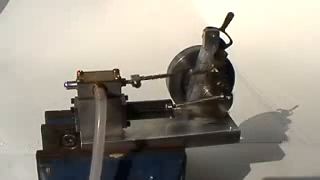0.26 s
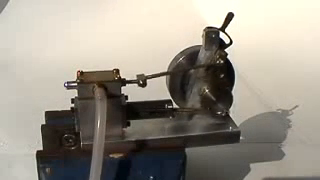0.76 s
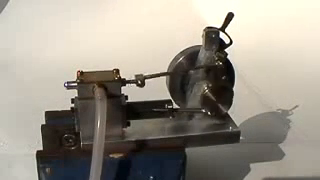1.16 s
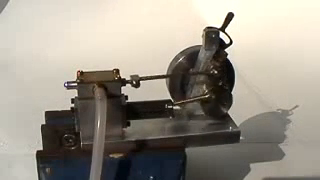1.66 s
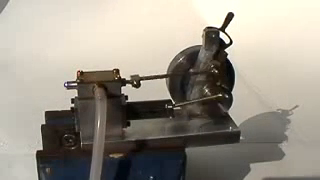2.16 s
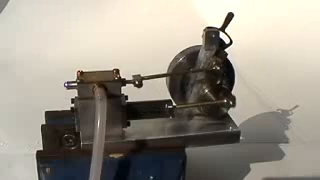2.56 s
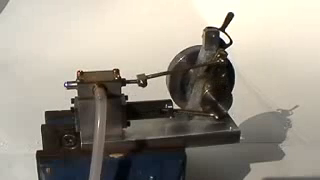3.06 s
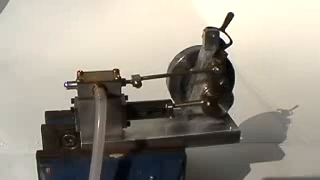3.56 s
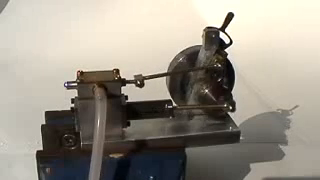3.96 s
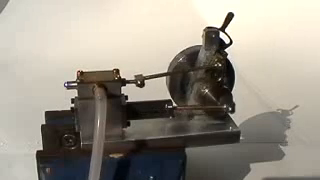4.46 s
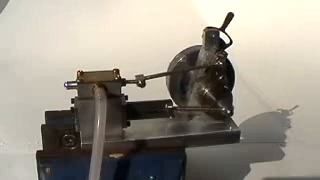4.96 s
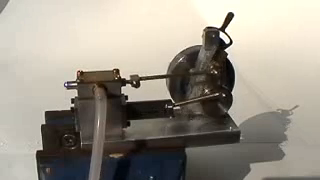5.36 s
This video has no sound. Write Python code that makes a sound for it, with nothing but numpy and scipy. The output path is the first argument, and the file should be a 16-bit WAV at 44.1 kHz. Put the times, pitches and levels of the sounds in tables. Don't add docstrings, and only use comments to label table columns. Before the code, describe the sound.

A bench-top model engine, heard by a nearby camera microphone, rattles rapidly from the start with clicking exhaust puffs, leaking air and bearing rumble. The base begins rocking hollowly after two seconds. Just past three, the hiss falls and the engine slows to a looser, knocking chug with bench bumps, a tiny water spit and a tick near the end. Short dull reflections, mostly narrow stereo.

```python
import sys
import numpy as np
from scipy import signal
from scipy.fft import rfft, irfft, next_fast_len
from scipy.io import wavfile
from scipy.ndimage import uniform_filter1d

SR = 44100
rng = np.random.default_rng(int(sys.argv[2]) if len(sys.argv) > 2 else 0)


def volts_from_db(level):
    exponent = np.asarray(level, float) / 20
    return 10 ** exponent


def inscribe(sig):
    pcm = np.round(np.clip(np.atleast_2d(sig).T, -1, 1) * 32767)
    wavfile.write(sys.argv[1], SR, pcm.astype(np.int16))


N = 247401

FULL_SPEED_TURNS_PER_S = 9.43
FIRST_TURN = .039
BACK_TURN, BACK_DRIFT_TURN = .4696, .048
OPEN_TAP_DB = -24.3

# (time [s], level [dB])
AIR_DB = [(0, -24.5), (1.5, -24.5), (3.0, -24), (3.12, -26), (3.2, -30), (3.5, -29.5), (5.61, -29.5)]
# (time [s], speed [turns/s])
SPEED_TURNS_PER_S = [(0, 9.325), (.8, 9.389), (1.45, 9.414), (1.75, 9.606), (2.5, 9.697), (2.9, 9.5),
                     (3.1, 9.217), (3.3, 8.174), (3.55, 6.643), (3.9, 6.417), (4.25, 5.849), (4.8, 5.968),
                     (5.61, 5.597)]
# (time [s], level [dB])
SHAKE_DB = [(0, -36), (.5, -34.5), (1.8, -34.5), (2.5, -33), (2.83, -33), (3.05, -31), (4.4, -30),
            (5.0, -31.5), (5.61, -33)]
# (time [s], level on its clicks [dB])
PLAY_DB = [(0, 0), (2.4, 0), (2.6, -2), (3.0, -2), (3.2, 0), (3.5, 2), (3.6, -4), (3.8, -3), (3.94, 1),
           (4.3, 1.5), (4.78, 3), (4.9, -3), (5.61, -2)]

# (frequency [Hz], density [dB/Hz])
LOW_RUMBLE = [(15, -63), (25, -33), (34, -69), (43, -12.5), (97, -5), (124, -4), (167, -2.5), (215, -7),
              (249, 1.5), (290, -60), (380, -35), (640, -120)]
# (frequency [Hz], density [dB/Hz])
UPPER_RUMBLE = [(140, -7), (240, -23), (275, 0), (389, -2.5), (408, -7), (451, -16), (494, -5.5),
                (588, -10), (653, -10.5), (790, -7), (862, -17), (951, -24), (1050, -27), (1360, -45),
                (2310, -120)]
# (frequency [Hz], width [Hz], level over rumble [dB])
BENCH_PEAKS = [(345, 30, 0), (380, 40, 2.5), (648, 22, 7), (914, 35, 2)]
# (frequency [Hz], density [dB/Hz])
HISS = [(2350, -15), (4000, -12), (4650, -12), (4900, -3.5), (5100, -5.5), (5840, -3), (6290, -7),
        (6750, -3), (7180, -4), (7770, -4.5), (9190, -8.5), (9560, -7.5), (10600, 0.5), (11000, -1),
        (11400, -5), (14900, -75), (22000, -120)]
# (frequency [Hz], width [Hz], level over hiss [dB])
JET_PEAKS = [(5096, 200, 8), (5790, 160, 4), (7000, 250, -6), (11100, 1240, 3.5)]
# (frequency [Hz], density [dB/Hz])
WASH = [(470, -36), (800, -3.5), (893, 5.5), (1030, -4), (1240, 1.5), (1580, 0.5), (1820, 0.5), (2030, 2),
        (3800, -2.5), (4600, 2), (5980, 2.5), (10100, -120)]

# (time [s], peak [dB], frequency [Hz])
BUMPS = [(3.283, -23.5, 178), (3.35, -29, 143), (3.519, -27, 207), (3.628, -27, 190), (3.79, -44, 310),
         (4.148, -21.5, 187), (4.199, -19, 210), (4.33, -24, 222), (4.532, -18.5, 169), (4.726, -30, 191),
         (5.051, -21.5, 213), (5.108, -30, 123), (5.204, -20, 191)]
# (time [s], peak [dB], frequency [Hz])
ROCKS = [(2.25, -26.5, 359), (2.362, -28, 348), (2.469, -21.5, 328), (2.57, -22, 320), (2.67, -25, 307),
         (2.781, -24, 311), (2.88, -28, 310), (3.016, -25.5, 373), (3.097, -22.5, 301)]

# (frequency [Hz], level [dB], t60 [s])
OUT_THUMP = [(200, 0, .05), (352, -5, .045), (384, -6, .15), (655, -12, .05), (140, -8, .04)]
# (frequency [Hz], level [dB], t60 [s])
BACK_THUMP = [(180, 0, .03), (306, -1, .03), (376, -15, .12), (570, -10, .012)]
# (frequency [Hz], level [dB], t60 [s])
OUT_CLICK = [(1168, -5, .014), (1771, 1.5, .022), (2185, 0, .016), (2900, -11, .01)]
# (frequency [Hz], level [dB], t60 [s])
BACK_CLICK = [(1100, -7, .008), (1780, -3, .015), (2080, 0, .022), (2450, -8, .02)]
# (frequency [Hz], level [dB], t60 [s])
ROD = [(500, -8, .03), (648, 0, .075), (760, -5, .02), (880, -4, .02)]
# (frequency [Hz], level [dB], t60 [s])
VALVE = [
    [(7900, 0, .04), (2600, -9, .03)],
    [(8000, 0, .045), (2650, -3, .03), (3100, -6, .022)],
]
# (delay [s], level [dB])
SLACK = [
    [(.013, -7), (.0192, -12)],
    [(.008, -3), (.0107, 0), (.0203, -7), (.026, -7)],
]
# (delay [s], level over pop [dB])
PORT = [
    [(.0002, -3), (.0022, 0), (.038, -12)],
    [(.0002, 0), (.028, -16)],
]
TOUCH_DB = [-8, -30]
# (full-speed level [dB], loss per dB of air [dB],
# loss at twice the turn time [dB], scatter [dB])
CLICK_FORCE = [(-15.7, 1.1, 7, 1), (-18.2, .3, 4.5, .6)]
# same columns, all [dB]
THUMP_FORCE = [(-18.7, .4, 13, .7), (-24.5, 1.2, 9, .8)]
# same columns, all [dB]
KNOCK_FORCE = [(-19, 1.3, 0, 1), (-24, 2.3, -3.5, 0.58)]
# same columns, all [dB]
SEAT_FORCE = [(-24.5, 0.43, 2.6, 1.7), (-25, 0.22, 1, 1)]

# (frequency [Hz], level under middle [dB])
APART = [(30, -15), (100, -12.5), (300, -16.5), (800, -14), (1400, -8.5), (2400, -11.5), (4000, -12),
         (5200, -20), (7000, -16), (9000, -12), (11500, -19)]
# (start [s], end [s])
STEREO_SPANS = [(1.315, 1.514), (1.644, 1.744), (2.058, 2.118), (2.336, 2.387), (2.711, 2.768),
                (3.129, 3.234), (3.451, 3.512), (3.963, 4.023), (4.055, 4.153), (4.335, 4.396),
                (4.519, 4.625), (5.172, 5.229), (5.31, 5.37), (5.402, 5.464), (5.541, 5.598)]
# (start [s], end [s])
MONO_SPANS = [(1.815, 1.855), (3.665, 3.715)]


def curve(rows, t):
    return np.interp(t, *np.transpose(rows))


def spans(rows):
    t = np.arange(N) / SR
    return uniform_filter1d(sum((t > a) * (t < b) * 1. for a, b in rows), size=500)


def colour(x, shape):
    hz = np.maximum(np.arange(N // 2 + 1) * SR / N, 1)
    f, db = np.transpose(shape)
    return irfft(rfft(x) * volts_from_db(np.interp(np.log(hz), np.log(f), db)), N)


def walk(rate_hz):
    k = int(SR / rate_hz)
    steps = np.repeat(rng.standard_normal(N // k + 1), k)
    return 0.63 * uniform_filter1d(uniform_filter1d(steps, k), k)[:N]


def noise(shape, peaks=(), flicker_db=1, rate_hz=10, grain_db=0, count=4):
    size = next_fast_len(N)
    hz = np.maximum(np.arange(size // 2 + 1) * SR / size, 1)
    f, db = np.transpose(shape)
    gain = volts_from_db(np.interp(np.log(hz), np.log(f), db, left=-120, right=-120))
    for centre_hz, width_hz, peak_db in peaks:
        gain = gain * volts_from_db(peak_db / (1 + (2 * (hz - centre_hz) / width_hz) ** 2))
    lumps = volts_from_db(grain_db * rng.exponential(size=N))
    spectrum = rfft(rng.standard_normal(N) * lumps, size) * gain
    place = np.interp(np.log(hz), np.log(f[[0, -1]]), [0, count - 1])
    out = 0
    for k in range(count):
        band = irfft(spectrum * np.clip(1 - abs(place - k), 0, 1), size)[:N]
        out = out + band * volts_from_db(flicker_db * walk(rate_hz))
    return out / np.std(out)


def ring(modes, push_s):
    t = np.arange(6000) / SR
    y = sum(volts_from_db(db) * np.cos(2 * np.pi * hz * t) * 1000. ** (-t / t60_s) for hz, db, t60_s in modes)
    y = np.convolve(y, np.sin(np.pi * np.clip(t[:200] / push_s, 0, 1)))
    return y / abs(y).max()


def strike(at_s, db, sound):
    hits = np.zeros(N + 1)
    place = np.clip(np.asarray(at_s) * SR, 0, N - 1)
    whole = place.astype(int)
    hits[whole] = volts_from_db(db) * (1 - place + whole)
    hits[whole + 1] = volts_from_db(db) * (place - whole)
    return signal.fftconvolve(hits, sound)[:N]


def room(x, t60_s=.14, wet_db=-16, dull_hz=2500):
    t = np.arange(9000) / SR
    tail = rng.standard_normal(len(t)) * 1000. ** (-t / t60_s) * (t > .006)
    tail = signal.lfilter(*signal.butter(1, dull_hz, fs=SR), tail)
    return volts_from_db(wet_db) * signal.fftconvolve(x, tail / np.sqrt(np.sum(tail ** 2)))[:N]


def capsules(mid):
    lean = 0.39 * signal.lfilter(*signal.butter(1, 450., fs=SR), mid)
    early = 0.47 * np.gradient(colour(mid, [(8000, -15), (10500, 0.5)]))
    scatter = rng.standard_normal(16000) * np.exp(-np.arange(16000) / 4000)
    scatter = scatter / np.sqrt(np.sum(scatter ** 2))
    side = lean + early + colour(signal.fftconvolve(mid, scatter)[:N], APART)
    return np.array([mid + side, mid - side])


def crank():
    t = np.arange(N) / SR
    speed = curve(SPEED_TURNS_PER_S, t)
    turns = np.cumsum(speed) / SR - FIRST_TURN
    back = turns - BACK_TURN - BACK_DRIFT_TURN * (FULL_SPEED_TURNS_PER_S / speed - 1)
    return [np.interp(np.arange(int(angle[-1]) + 1), angle, t) for angle in (turns, back)]


def exhaust_pulse(ends_s, rise_s, decay_s):
    t = np.arange(4000) / SR
    at_s = np.concatenate(ends_s)
    return strike(at_s, 0 * at_s, np.exp(-t / decay_s) * (1 - np.exp(-t / rise_s)))


def bearing_rumble(shake_db, upper_db, breath):
    low = noise(LOW_RUMBLE, [(213, 35, 3)], flicker_db=-2.5, rate_hz=6.8)
    upper = noise(UPPER_RUMBLE, BENCH_PEAKS, flicker_db=0.0, rate_hz=11.0, grain_db=1.5)
    return volts_from_db(shake_db - 3.5) * low + volts_from_db(upper_db - 2.0) * (1.02 + 0.62 * breath) * upper


def exhaust_wash(wash_db, breath):
    wash = noise(WASH, [(1580, 124, 4.2)], flicker_db=2.0, rate_hz=12., grain_db=1.5, count=9)
    return volts_from_db(wash_db) * (1.017 + 0.38 * breath) * wash


def leak_hiss(hiss_db, puff):
    hiss = noise(HISS, JET_PEAKS, flicker_db=0.94, rate_hz=22., count=5)
    hiss = volts_from_db(hiss_db) * (1 + 0.24 * puff) * hiss
    dulling = np.clip(-.07 * (hiss_db + 26.5), 0, 1)
    return hiss - dulling * colour(hiss, [(7000, -46), (10000, 0.5)])


def bench_knocks():
    out = 0
    for at_s, db, hz in BUMPS:
        out = out + strike([at_s], db + 0.5, ring([(hz, 0, .07), (1.65 * hz, -9, .04)], push_s=0.002))
    for at_s, db, hz in ROCKS:
        out = out + strike([at_s], db, ring([(hz, 0, .16)], push_s=0.0013))
    tick = [(450, -3, .02), (700, -1, .02), (850, -3, .02), (1000, -1, .022), (1150, -5, .015)]
    return out + strike([5.122], -19.5, ring(tick, push_s=.0004))


def water_spit():
    t = np.arange(1500) / SR
    pitch_hz = 5600 - 1900 * np.clip(t / .022, 0, 1) ** 1.4
    whistle = np.sin(2 * np.pi * np.cumsum(pitch_hz) / SR)
    ragged = .65 + 1.6 * uniform_filter1d(rng.standard_normal(len(t)), size=40)
    swell = np.sin(np.pi * np.clip(t / 0.026, 0, 1) ** 0.51)
    return strike([4.688], -23, swell * whistle * ragged)


def force(rule, at_s):
    full_db, per_air, slow_db, scatter_db = rule
    longer = FULL_SPEED_TURNS_PER_S / curve(SPEED_TURNS_PER_S, at_s) - 1
    air_db = curve(AIR_DB, at_s) - OPEN_TAP_DB
    return full_db + per_air * air_db - slow_db * longer + scatter_db * rng.standard_normal(len(at_s))


def rod_knocks(k, at_s, play_db):
    slow = FULL_SPEED_TURNS_PER_S / curve(SPEED_TURNS_PER_S, at_s)
    knock_db = force(KNOCK_FORCE[k], at_s) + np.minimum(play_db, 0) * (slow < 1.1)
    out = 0
    for lag_s, db in SLACK[k]:
        loose = rng.standard_normal((len(at_s), 2)).T
        knock_s = at_s + lag_s * slow ** .2 + .0002 * loose[0]
        out = out + strike(knock_s, knock_db + db + loose[1], ring(ROD, push_s=.0009))
    return out


def strokes(ends_s):
    out = 0
    for k, (thump, click) in enumerate([(OUT_THUMP, OUT_CLICK), (BACK_THUMP, BACK_CLICK)]):
        at_s = ends_s[k]
        play_db = k * curve(PLAY_DB, at_s)
        click_db = force(CLICK_FORCE[k], at_s) + play_db
        thump_db = force(THUMP_FORCE[k], at_s)
        out = out + strike(at_s, thump_db + 5 - k, ring(thump, push_s=.0008))
        out = out + strike(at_s - .003, thump_db + TOUCH_DB[k], ring(thump[1:], push_s=.0008))
        for lag_s, db in PORT[k]:
            contact_db = click_db + db + .6 * rng.standard_normal(len(at_s))
            out = out + strike(at_s + lag_s, contact_db, ring(click, push_s=.0002))
        seat_db = force(SEAT_FORCE[k], at_s) + play_db
        out = out + strike(at_s + .0025, seat_db, ring(VALVE[k], push_s=.00006))
        out = out + rod_knocks(k, at_s, play_db)
    return out


def scene():
    t = np.arange(N) / SR
    hiss_db, shake_db = curve(AIR_DB, t), curve(SHAKE_DB, t)
    air_rise_db = hiss_db - OPEN_TAP_DB
    shake_rise_db = shake_db - SHAKE_DB[1][1]
    upper_db = -36 + 0.67 * shake_rise_db + 0.63 * air_rise_db
    wash_db = -35 + 0.51 * shake_rise_db + 0.71 * air_rise_db
    ends_s = crank()
    puff = exhaust_pulse(ends_s, rise_s=.001, decay_s=.01)
    breath = exhaust_pulse(ends_s, rise_s=.0028, decay_s=.03)
    hits = strokes(ends_s) + bench_knocks() + water_spit()
    air = leak_hiss(hiss_db, puff) + exhaust_wash(wash_db, breath)
    rumble = bearing_rumble(shake_db, upper_db, breath)
    return capsules(hits + room(hits) + air + rumble)


def roll_off(x):
    return signal.sosfilt(signal.butter(12, 12800, fs=SR, output="sos"), x)


def record(dry):
    split_hz, top_hz = 800, 11480
    x = signal.sosfilt(signal.butter(3, 45., "highpass", fs=SR, output="sos"), dry)
    mid, side = (x[0] + x[1]) / 2, (x[0] - x[1]) / 2
    bass = colour(side, [(split_hz, 0), (split_hz + 60, -90)])
    side = bass * (1 - spans(MONO_SPANS)) + (side - bass) * spans(STEREO_SPANS)
    top_cut = [(top_hz, 0), (top_hz + 60, -38), (top_hz + 250, -70)]
    mix = np.array([colour(v, top_cut) for v in (mid + side, mid - side)])
    return roll_off(mix)


dry = scene()
out = record(dry)
inscribe(out)
```